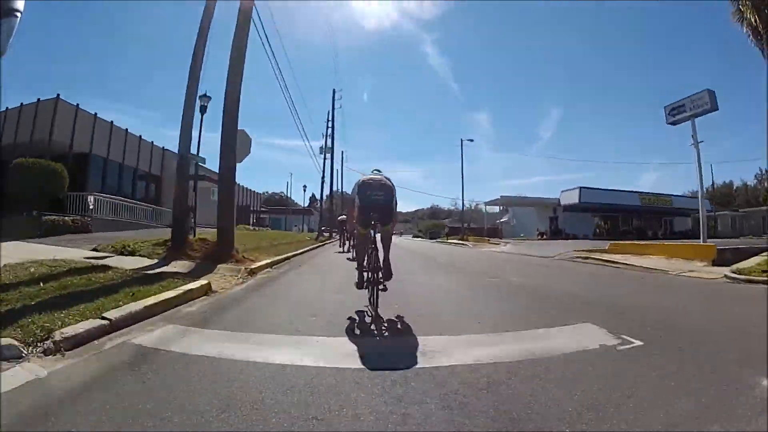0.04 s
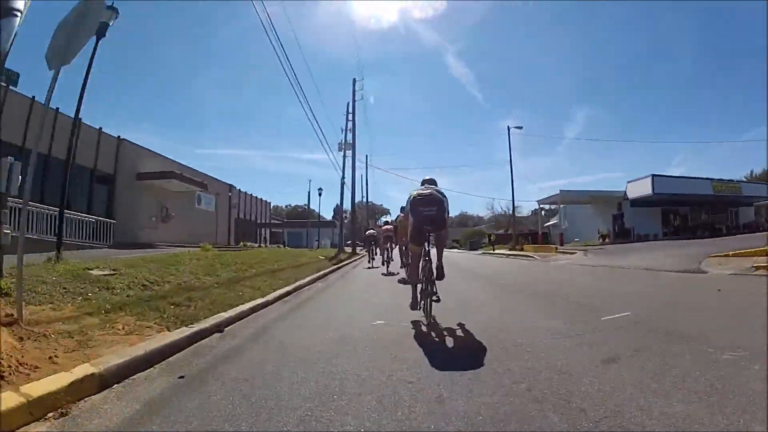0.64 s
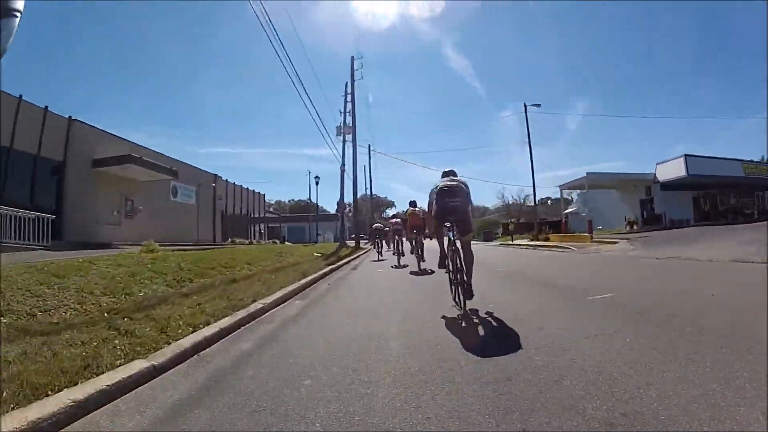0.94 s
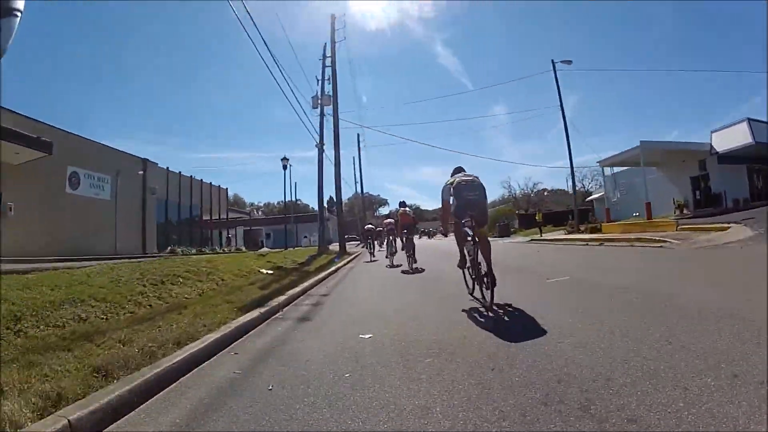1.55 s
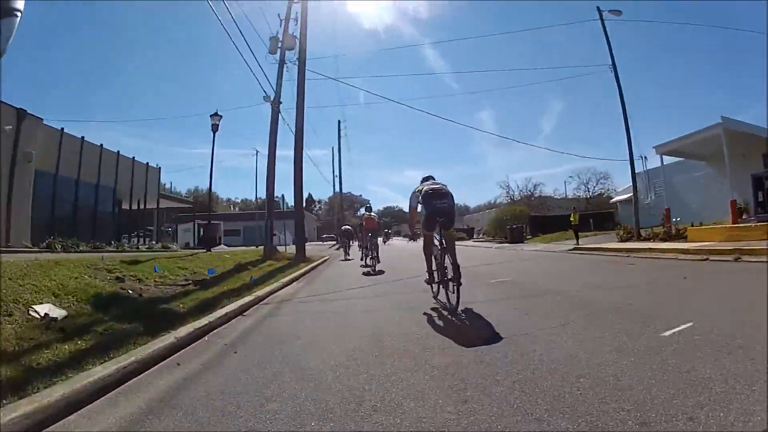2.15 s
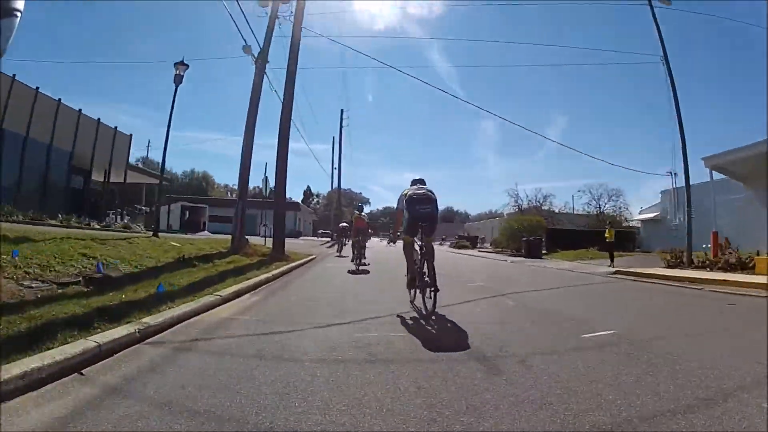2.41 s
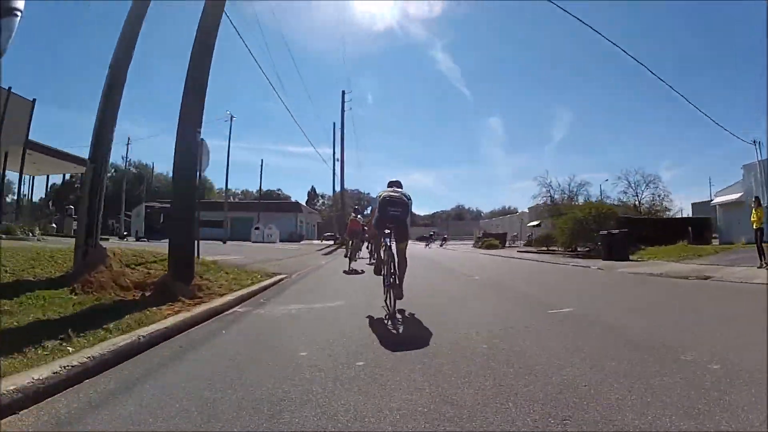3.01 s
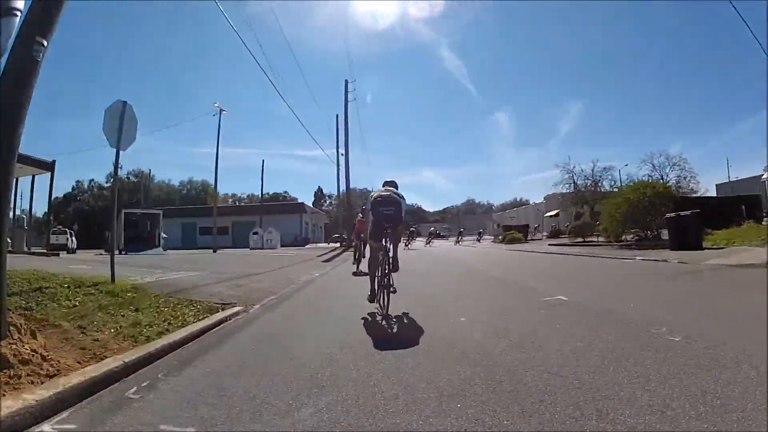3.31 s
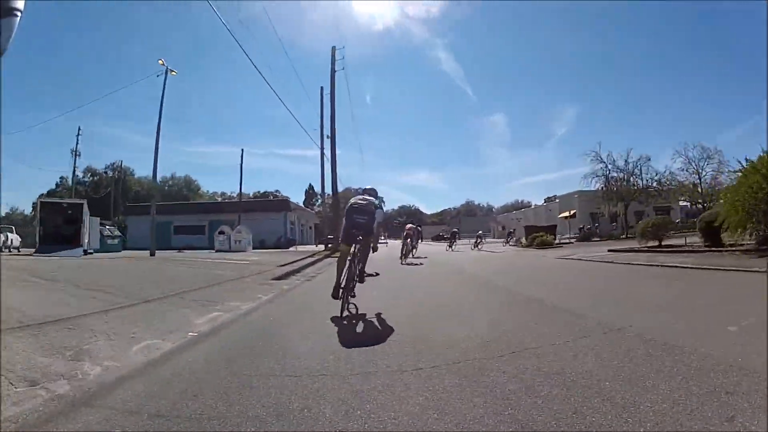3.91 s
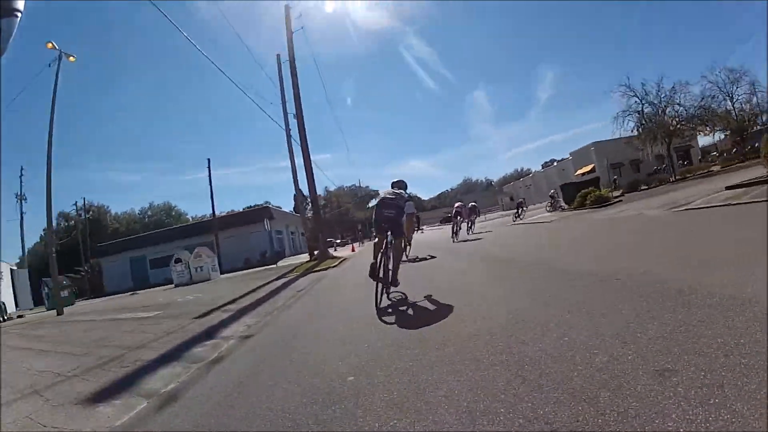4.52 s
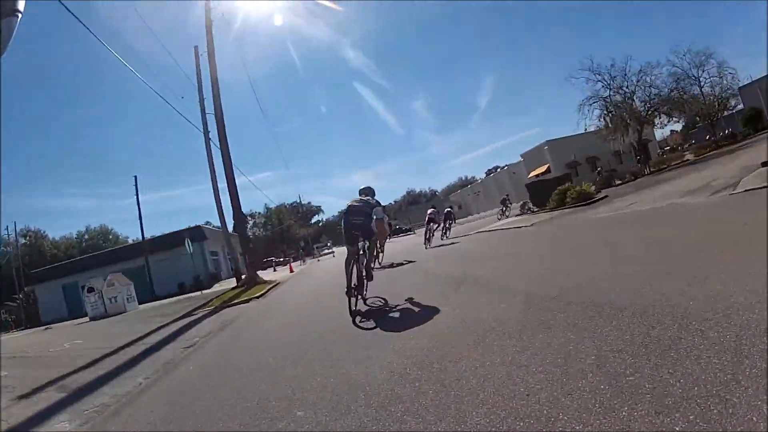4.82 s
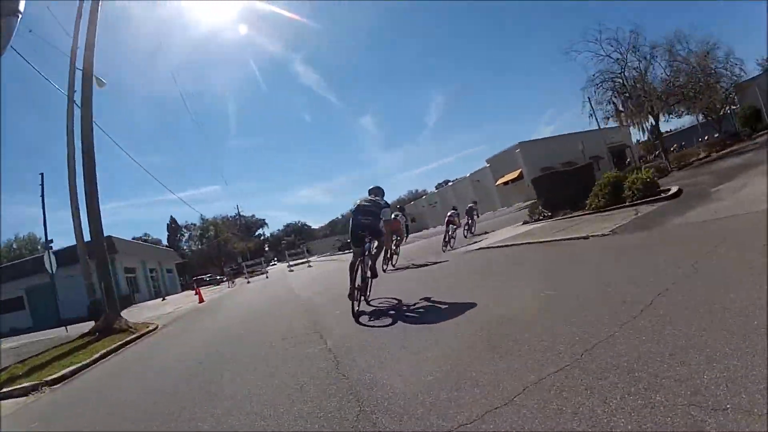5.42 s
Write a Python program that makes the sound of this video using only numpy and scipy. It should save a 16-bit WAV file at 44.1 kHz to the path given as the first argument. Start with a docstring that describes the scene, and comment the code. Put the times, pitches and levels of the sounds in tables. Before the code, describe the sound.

Wind buffets a camera in a closed housing on a moving road bicycle, making a low, uneven rumble for the whole five and a half seconds. With it runs the hollow rush of tyres on asphalt, topped by a thin sizzle. For the first second or so the rush pulses with hard pedalling, about three strokes a second, then grows smoother. The chain ticks and rattles on and off, and small gusts thump the housing. A quick cluster of knocks shakes the mount in the first half second, with single ones near 1.1 and 1.4 seconds. Several more come around 3.3 seconds. The three hardest knocks land between 4.1 and 4.4 seconds, along with a chain rattle and a sharp click, and the sound dips briefly after them. From about 4.4 seconds, a few very faint, short squeaks sound under the continuing wind and tyres.

```python
"""Wind buffets and tyres rush, heard from a camera in a closed housing on a road bicycle.
The rush rings in frame and housing and pulses with the pedal strokes. The chain ticks and
rattles over rough road, jolts knock the camera mount, and late on a dry part squeaks faintly.
The camera turns itself down after hard knocks, clips the peaks and holds each sample
at a low rate, which mirrors the rush into a thin sizzle."""
import sys
import numpy as np
from scipy import signal
from scipy.fft import rfft, irfft, next_fast_len
from scipy.io import wavfile
from scipy.ndimage import minimum_filter1d, map_coordinates

SR = 44100
rng = np.random.default_rng(int(sys.argv[2]) if len(sys.argv) > 2 else 0)


def materialize(psi):
    """Save the field psi as 16-bit PCM at rate SR to the path in sys.argv[1].

    A 1-D psi becomes a single channel; in a 2-D psi each row is a channel.
    """
    bounded = np.clip(np.atleast_2d(psi).T, -1, 1)
    quanta = np.round(bounded * 32767).astype(np.int16)
    wavfile.write(sys.argv[1], SR, quanta)


N = 244755

# Levels in these tables are relative: the functions set the final loudness.
# strength of the steady wind: time_s, level_db
WIND_LEVELS = [(0, -20), (1.15, -21), (2.0, -22), (2.46, -19.5), (2.55, -29), (2.76, -22.5), (3.25, -20),
               (3.5, -25.5), (3.9, -25), (4.3, -19), (5.1, -22), (5.5, -21)]
# tone of the wind's buffeting: pitch_hz, level_db
BUFFET_TONE = [(10, -28), (22, 2), (38, -2.5), (52, -0.5), (72, 4), (100, -1.5), (165, -4.5), (220, -1),
               (300, -9), (360, -10), (600, -25), (1500, -77)]
# boom of the mount in the wind: pitch_hz, width_hz, level_db
MOUNT_RESONANCES = [(123, 240, -10), (211, 22, -3.5)]
# loudness of the tyres on the asphalt: time_s, level_db
ROAD_LEVELS = [(0, -0.5), (0.3, 1), (0.4, -2.5), (0.6, 0), (1.2, 0.5), (3.1, -0.5), (3.5, -1), (3.95, 0),
               (4.3, 1.5), (4.6, 1.5), (4.8, -1.5), (5.55, 0)]
# ringing of the bicycle frame: pitch_hz, width_hz, level_db
FRAME_RESONANCES = [(411, 39, -15), (490, 61, -8.5), (641.8, 40, 2), (715, 77, -6), (791.5, 38, -4)]
# ringing of the camera housing: pitch_hz, width_hz, level_db
HOUSING_RESONANCES = [(880, 120, -8), (1098.4, 54.5, 4), (1265, 58, -4), (1438, 81, -8.5)]
# tone of the tyres' hiss: pitch_hz, level_db
HISS_TONE = [(500, 0), (1200, -5.5), (1560, -14), (1700, 2.5), (1900, 1), (2600, 0), (3000, -7),
             (3600, -8.5), (4000, -9), (4400, -15.5), (5100, -14), (5600, -30), (6000, -27)]
# how hard the rider pedals, a sprint and then easing off: time_s, effort_0_to_1
PEDAL_EFFORT = [(0, 0.9), (1.1, 0.76), (1.6, 0.31), (3.0, 0.36), (3.5, 0.4), (4.0, 0), (5.55, 0.1)]
# tone of the rattling chain: pitch_hz, level_db
RATTLE_TONE = [(500, 1.5), (1200, -2.5), (1700, 4), (2300, -1.5), (2750, 0.5), (3200, -3), (3600, -4.5),
               (3980, 2), (4450, -5), (5000, -12.5), (5500, -9), (6000, -19.5)]
# single clicks of the drivetrain: start_s, level_db
CHAIN_CLICKS = [(0.1573, -7), (0.205, 0), (0.326, -12), (0.4344, -8), (0.477, -13), (0.708, -8),
                (0.8436, -3), (1.932, -10), (1.9774, -9.5), (2.252, -8), (2.303, -12), (2.4215, -8.5),
                (2.481, -11), (3.024, -15), (3.4348, -7), (4.297, 2), (4.791, -12), (4.8144, -9)]
# gusts that thump on the housing: peak_s, level_db
WIND_GUSTS = [(0.045, -18), (0.39, -17), (0.675, -17), (0.81, -16.5), (0.94, -21), (1.32, -14.5),
              (1.54, -15.5), (1.72, -16), (1.96, -16), (2.09, -16), (2.24, -17.5), (2.44, -19.5),
              (3.03, -18), (3.27, -18.5), (5.36, -16)]
# tone of a gust: pitch_hz, level_db
GUST_TONE = [(12, -15), (35, 2), (70, 0.5), (120, 1), (180, -5), (260, -7), (360, -8.5), (550, -21.5),
             (1500, -52)]
# jolts that knock the mount: start_s, thud_db, clack_db, thud_rise_s
JOLTS = [(0.0744, 0, -3.5, 0.0031), (0.101, -2.5, -9.5, 0.0012), (0.1839, 1, -6, 0.00094),
         (0.191, -2, -11, 0.0014), (0.2144, -4.5, -11, 0.0027), (0.447, -2, -8, 0.0048),
         (1.060, -1.5, -18, 0.0052), (1.413, -2.5, -13.5, 0.0029), (2.004, -8.5, -29, 0.0017),
         (3.266, -11, -9.5, 0.0036), (3.312, 2, -14.5, .003), (3.381, -4, -26, .003),
         (3.409, -1, -17.5, 0.0043), (4.0793, 4, 3, 0.0013), (4.2413, 7, 9.5, 0.0022),
         (4.4251, 10.5, -2, 0.0025), (4.800, -7, -10.5, 0.0032)]
# ringing of the mount's soft parts: pitch_hz, level_db, fade_s (time to fall 60 dB)
THUD_TONES = [(211, -10, 0.028), (479, -10, .014), (642, 3.5, 0.017), (856, -13, 0.029), (1128, -1, 0.012)]
# ringing of its hard parts: pitch_hz, level_db, fade_s
CLACK_TONES = [(1690, 10, 0.015), (2290, 8, 0.0089), (2538, 0.36, 0.016), (3097, 6.9, 0.0071),
               (3790, 1.2, 0.015)]
# rough road that rattles the chain and drums on the frame: start_s, length_s, level_db
ROUGH_PATCHES = [(0.262, 0.07, -32), (0.437, 0.086, -35.5), (0.715, 0.15, -37), (1.24, 0.036, -37),
                 (1.465, 0.18, -36), (1.76, 0.052, -37.5), (2.036, 0.12, -35), (2.285, 0.077, -34.5),
                 (2.825, 0.025, -37), (2.947, 0.076, -33.5), (3.232, 0.16, -33.5), (3.578, .04, -37.5),
                 (3.679, 0.043, -33.5), (3.95, 0.15, -39.5), (4.191, 0.029, -23.5), (4.37, .06, -29),
                 (4.797, 0.061, -33.5), (5.025, 0.052, -37)]
# faint squeaks of the bicycle: peak_s, pitch_hz, level_db
DRY_SQUEAKS = [(4.365, 2080, -35), (4.622, 2030, -32), (5.006, 2050, -29), (5.195, 2080, -31),
               (5.392, 2040, -31), (5.483, 1830, -29)]


def amp(db):
    """Turn decibels into a number to multiply a sound by."""
    return 10 ** (np.asarray(db) / 20)


def unit(x):
    """Scale a sound to an average power of 1."""
    return x / np.sqrt(np.mean(x ** 2) + 1e-20)


def db_sum(a_db, b_db):
    """Level of two unrelated sounds together."""
    return 10 * np.log10(amp(a_db) ** 2 + amp(b_db) ** 2)


def curve(points):
    """Join (time_s, value) points with straight lines, one value per sample."""
    return np.interp(np.arange(N) / SR, *np.transpose(points))


def wobble(rate):
    """A smooth curve through `rate` random values a second."""
    return map_coordinates(rng.standard_normal(int(N * rate / SR) + 4), [np.arange(N) * rate / SR])


def filtered(x, gain):
    """Make each pitch in x louder or softer, as gain(hz) says."""
    size = 2 * next_fast_len(N // 2 + 8192)
    cepstrum = irfft(np.log(np.maximum(gain(np.fft.rfftfreq(size, 1 / SR)), 1e-6)))
    # this fold makes the filter ring only after a sound, never before it
    cepstrum[1:size // 2] *= 2
    cepstrum[size // 2 + 1:] = 0
    return irfft(rfft(x, size) * np.exp(rfft(cepstrum)))[:N]


def colour(points):
    """A filter shape drawn through (pitch_hz, level_db) points."""
    pitches, db = np.transpose(points)
    return lambda hz: amp(np.interp(np.log(hz + 1), np.log(pitches), db))


def body(modes, low_hz, high_hz):
    """The filter shape of a ringing object, falling steeply outside low_hz to high_hz."""
    def gain(hz):
        power = sum(amp(db) ** 2 / (1 + (2 * (hz - pitch) / width) ** 2) for pitch, width, db in modes)
        return np.sqrt(power / (1 + (low_hz / (hz + 1)) ** 10) / (1 + (hz / high_hz) ** 24))
    return gain


def noise(shape):
    """Steady noise with the given filter shape."""
    return unit(filtered(rng.standard_normal(N), shape))


def wind(level_db):
    """Swirls of air press on the housing in lumps; strong ones add deep buffeting to the mount's boom."""
    mean_db = np.mean(level_db)
    swing_db = level_db - mean_db
    buffet = unit(amp(1.1 * wobble(12)) * noise(colour(BUFFET_TONE)))
    boom = noise(body(MOUNT_RESONANCES, low_hz=88, high_hz=310.5))
    return amp(mean_db + 1.49 * swing_db - 1.7) * buffet + amp(mean_db + 0.18 * swing_db - 5.0) * boom


def grit(shake, grains_per_s=5000):
    """Grains of asphalt hit the tyres at random: tiny taps of scattered size."""
    taps = (rng.random(N) < grains_per_s / SR) * rng.standard_normal(N)
    return taps * amp(rng.standard_normal(N) + 0.84 * shake)


def tyres(hum_db, rush_db, shake):
    """Grit drums on the tyres, rings frame and housing, and leaves a hiss above them."""
    hum = unit(filtered(grit(shake), body(FRAME_RESONANCES, low_hz=342, high_hz=900)))
    rush = unit(filtered(grit(shake), body(HOUSING_RESONANCES, low_hz=925, high_hz=1338)))
    hiss = unit(filtered(grit(shake), colour(HISS_TONE)))
    # the hiss swells with the rush, but less
    hiss_db = -36.5 + 0.89 * (rush_db - np.mean(rush_db))
    return amp(hum_db + 0.18) * hum + amp(rush_db + 0.06) * rush + amp(hiss_db) * hiss


def pedalling(stroke_hz=3.1, speedup_hz_per_s=0.12, dead_spot_s=0.15):
    """The push slackens at the dead spot, where the pedals are upright, and the bicycle sways."""
    t = np.arange(N) / SR
    strokes = stroke_hz * (t - dead_spot_s) + speedup_hz_per_s * t ** 2 / 2
    effort = curve(PEDAL_EFFORT)
    slack = effort * np.abs(np.cos(np.pi * strokes)) ** 3.8
    sway = effort * np.cos(2 * np.pi * (strokes + 0.28))  # peaks just before the dead spot
    return slack, sway


def drivetrain(level_db, shake, contacts_per_s=110):
    """Chain and loose parts chatter as the bicycle shakes; now and then one click stands out."""
    t = np.arange(SR // 20) / SR
    contacts = (rng.random(N) < contacts_per_s / SR) * amp(1.5 * rng.standard_normal(N))
    power = np.abs(signal.fftconvolve(contacts ** 2, np.exp(-t / 0.0017))[:N])
    # between the contacts the chain keeps rustling
    bursts = np.sqrt(power + amp(-10) * np.mean(power))
    chatter = unit(filtered(bursts * amp(shake) * rng.standard_normal(N), colour(RATTLE_TONE)))
    # the louder clicks are single bursts in the same metal parts
    click_shape = np.exp(-t / 0.0049) * (1 - np.exp(-t / 0.00065))
    strikes = np.zeros(N + SR)
    for start_s, db in CHAIN_CLICKS:
        strikes[round(start_s * SR):][:len(t)] += amp(db - 14) * click_shape
    clicks = strikes[:N] * noise(colour(RATTLE_TONE))
    return amp(level_db + 1.5) * chatter + clicks


def gusts(rise_s=0.012, fall_s=0.04):
    """A large swirl of air strikes the housing: a quick swell of low noise that soon dies."""
    t = np.arange(N) / SR
    swell = sum(amp(db) * np.exp(-np.maximum((peak_s - t) / rise_s, (t - peak_s) / fall_s))
                for peak_s, db in WIND_GUSTS)
    return swell * noise(colour(GUST_TONE))


def ring(tones, t, rise_s):
    """A struck part rings with fading tones, a little different at each blow; the peak is 1."""
    wave = sum(amp(db + rng.normal(0, 1) - 60 * t / fade_s) * np.sin(2 * np.pi * hz * t)
               for hz, db, fade_s in tones)
    wave *= 1 - np.exp(-(t / rise_s) ** 2)
    return wave / np.abs(wave).max()


def knocks():
    """A jolt makes the mount clack at once, and its low thud builds up a moment later."""
    t = np.arange(SR // 20) / SR
    out = np.zeros(N + SR)
    for start_s, thud_db, clack_db, thud_rise_s in JOLTS:
        crack = amp(-9.5) * np.exp(-t / 0.0021) * rng.standard_normal(len(t))
        clack = ring(CLACK_TONES, t, rise_s=0.00051) + crack
        thud = ring(THUD_TONES, t, thud_rise_s)
        out[round(start_s * SR):][:len(t)] += amp(thud_db) * thud + amp(clack_db) * clack
    return out[:N]


def rough_road(rise_s=0.03, settle_s=0.029):
    """Shaking in dB: it rises into each rough patch, holds over it and then settles."""
    t = np.arange(N) / SR
    power = 1e-12
    for start_s, length_s, db in ROUGH_PATCHES:
        rise = np.clip((t - start_s) / rise_s + 1, 0, 1)
        settle = np.exp(-np.maximum(t - start_s - length_s, 0) / settle_s)
        power += (amp(db) * rise * settle) ** 2
    return 10 * np.log10(power)


def squeaks(half_length_s=0.0057, waver_hz=50.3):
    """A dry part rubs for a moment and gives a short, unsteady tone."""
    t = np.arange(N) / SR
    waver = np.cumsum(waver_hz * wobble(200)) / SR
    out = np.zeros(N)
    for peak_s, hz, db in DRY_SQUEAKS:
        swell = np.exp(-((t - peak_s) / half_length_s) ** 2)
        out += amp(db) * swell * np.sin(2 * np.pi * (hz * t + waver))
    return out


def scene():
    """Wind, tyres and drivetrain on one shaking bicycle, all pulsing with the pedal strokes."""
    slack, sway = pedalling()
    shake = wobble(65)
    road_db = curve(ROAD_LEVELS) + 0.5 * wobble(25)
    rough_db = rough_road()
    wind_db = curve(WIND_LEVELS) + 1.5 * sway
    # at the dead spot the tyres go quieter and the slack chain chatters more
    smooth_hum_db = -17.5 + road_db - 2 * slack
    rush_db = -19 + road_db - 10 * slack
    chatter_db = -45.5 + 11 * slack
    # rough patches add to the frame's hum and the chain's rattle
    hum_db = db_sum(smooth_hum_db, rough_db + 10) + 0.65 * wobble(30)
    rattle_db = db_sum(chatter_db, rough_db)
    bicycle = tyres(hum_db, rush_db, shake) + drivetrain(rattle_db, shake) + knocks() + squeaks()
    return (wind(wind_db) + gusts() + bicycle)[None]


def gain_control(x, threshold_db, recovery_db_per_s, hold_s):
    """Peaks over the threshold turn the volume down; after a short hold it climbs back."""
    over_db = np.maximum(20 * np.log10(np.abs(x) + 1e-9) - threshold_db, 0)
    half = int(hold_s * SR / 2)
    held_db = -minimum_filter1d(-over_db, 2 * half + 1, origin=half, mode='constant')
    climb_db = recovery_db_per_s * np.arange(N) / SR
    cut_db = np.maximum.accumulate(held_db + climb_db) - climb_db
    # the volume takes some milliseconds to fall, so the front of a knock passes at full size
    reaction = np.hanning(int(.0065 * SR))
    return x * amp(-np.convolve(cut_db, reaction / reaction.sum())[:N])


def below(x, edge_hz):
    """Keep only the sound below edge_hz, without delaying it."""
    return signal.fftconvolve(x, signal.firwin(301, edge_hz, fs=SR), 'same')


def record(dry):
    """The camera turns down and clips loud peaks, then holds each sample, which adds a thin sizzle."""
    hold_hz, clip_level = 12000, 0.92
    ducked = gain_control(dry[0], threshold_db=-1.0, recovery_db_per_s=57.0, hold_s=0.068)
    narrow = below(np.clip(ducked, -clip_level, clip_level), hold_hz / 2)
    # held samples form stair steps: they mirror the sound around hold_hz and soften the treble
    mirrored = narrow * (1 + 2 * np.cos(2 * np.pi * hold_hz * np.arange(N) / SR))
    softening = np.sinc(np.fft.rfftfreq(2 * N, 1 / SR) / hold_hz)
    stairs = irfft(rfft(mirrored, 2 * N) * softening)[:N]
    return below(stairs, edge_hz=15350)[None]


dry = scene()
out = record(dry)
materialize(out)
```